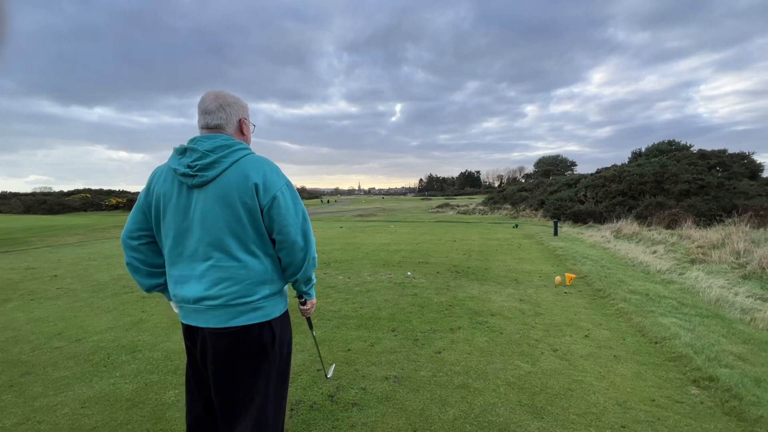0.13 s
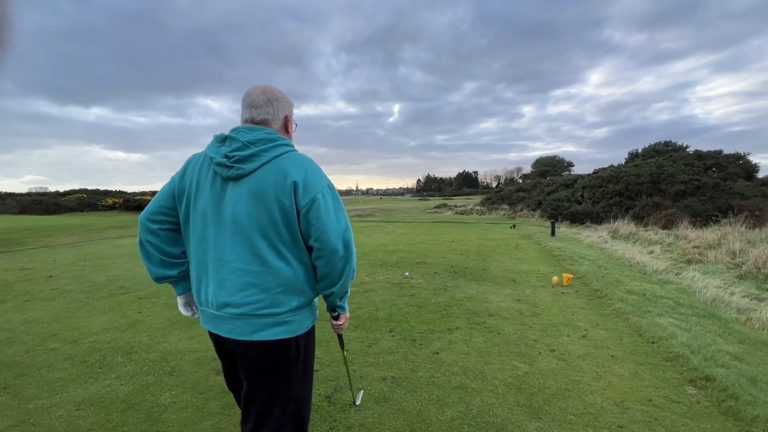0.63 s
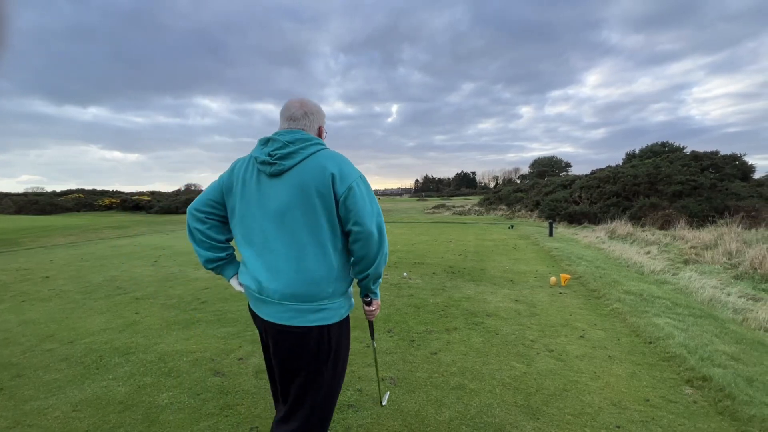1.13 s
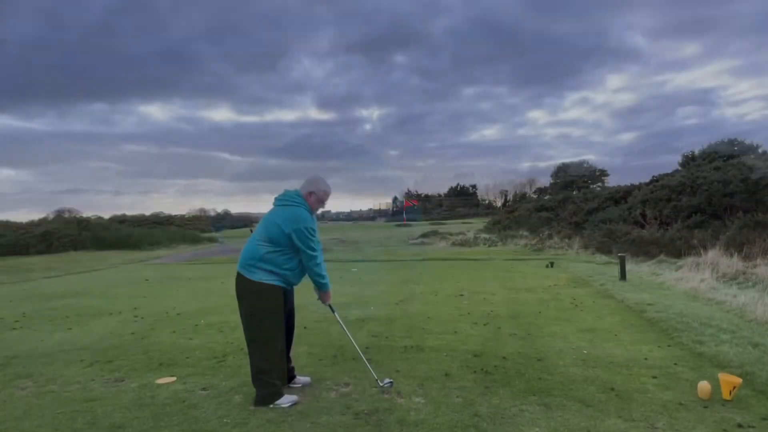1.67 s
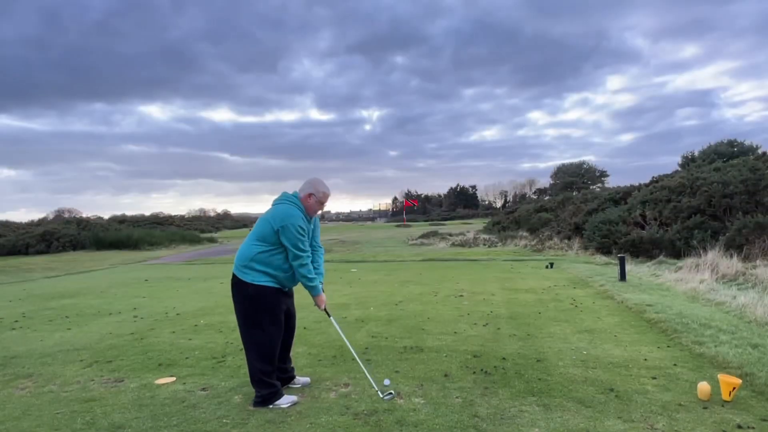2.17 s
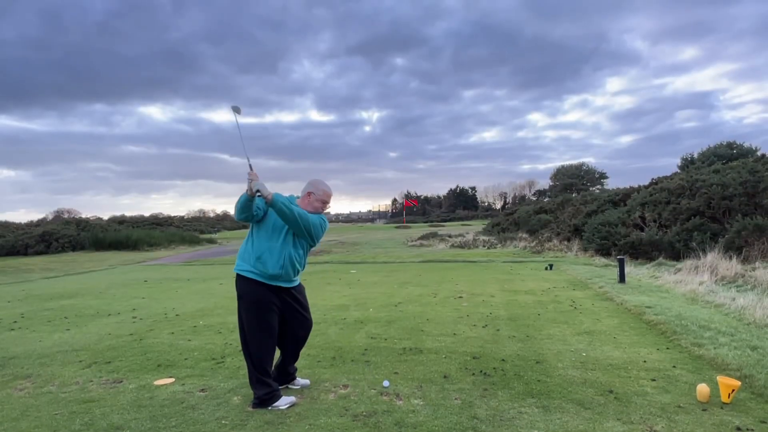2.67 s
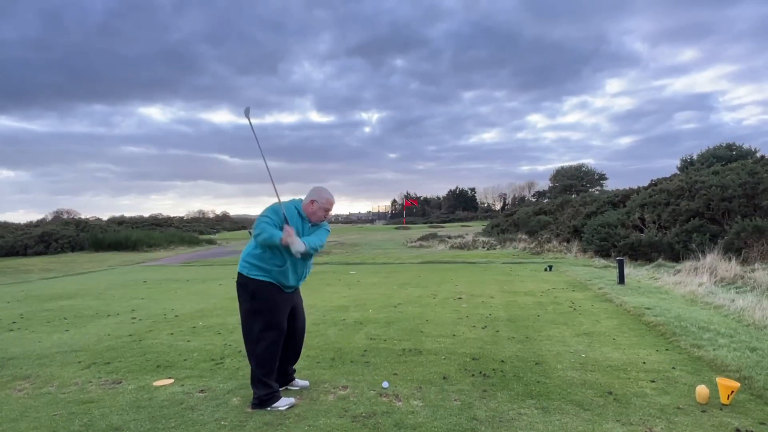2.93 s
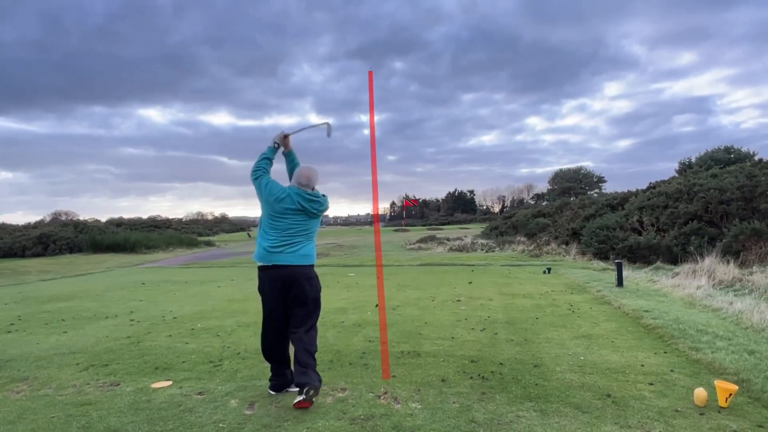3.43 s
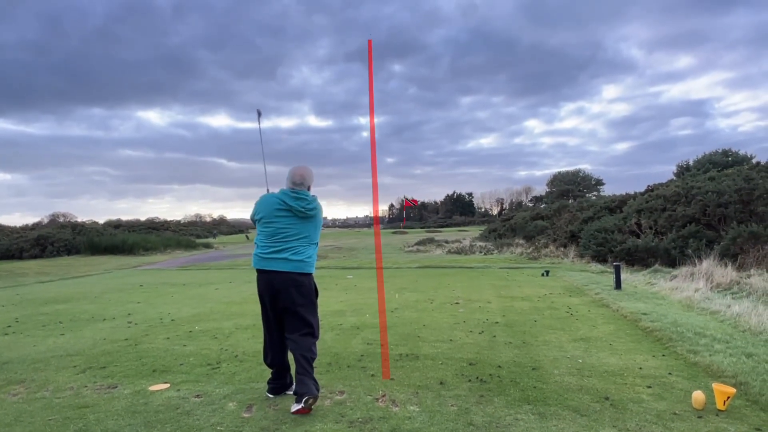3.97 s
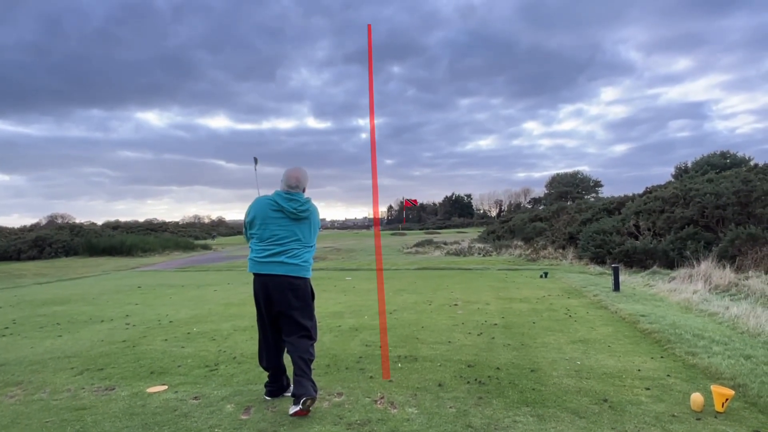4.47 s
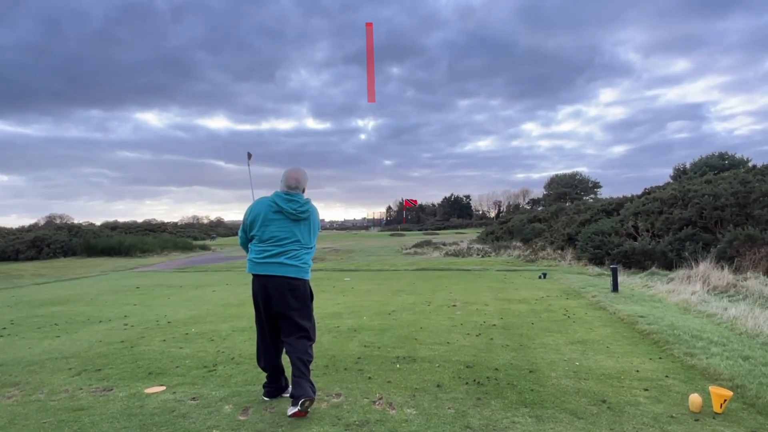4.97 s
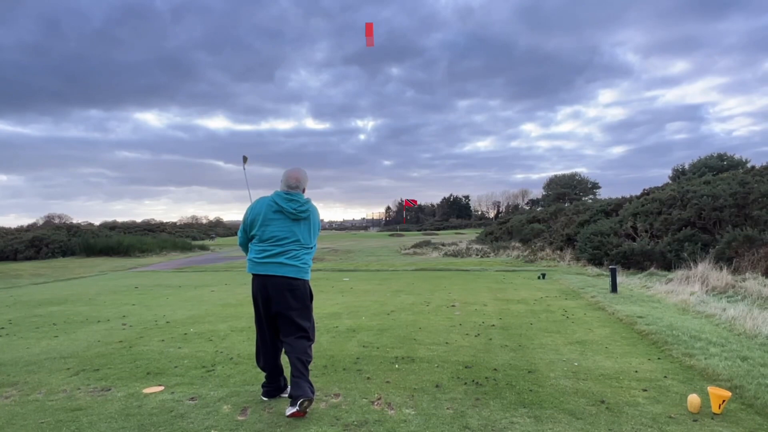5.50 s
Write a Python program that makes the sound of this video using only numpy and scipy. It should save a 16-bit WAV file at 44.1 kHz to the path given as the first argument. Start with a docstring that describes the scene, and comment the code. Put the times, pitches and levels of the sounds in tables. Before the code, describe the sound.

Quiet open-course rumble, cloth rustle and a quick falling bird trill, then one very loud, dry golf strike with a short scatter of grass.

```python
"""Open golf course: an iron swishes down, cracks on the ball, thumps the turf, and torn grass rains back.
Far traffic and wind are shaped noise; two distant engines near 60 Hz are sines that beat.
Birds are gliding sines with a diffuse tail; near cloth is noise that brightens with effort and breaks off
abruptly at 1.855 s. The strike is decaying club-head modes, noise cracks and sinking low thuds."""
import sys
import numpy as np
from scipy import signal
from scipy.fft import rfft, irfft
from scipy.io import wavfile
from scipy.ndimage import uniform_filter1d, map_coordinates

SR = 44100
rng = np.random.default_rng(int(sys.argv[2]) if len(sys.argv) > 2 else 0)


def file_out(sig):
    """Save sig as 16-bit WAV at sys.argv[1]."""
    # one column per channel
    cols = np.atleast_2d(sig).T
    # limit, then scale
    lim = np.clip(cols, -1, 1)
    pcm = np.round(lim * 32767).astype(np.int16)
    wavfile.write(sys.argv[1], SR, pcm)


def volts_from_decibels(level):
    """Turn decibel levels (scalar or array-like) into linear amplitude factors."""
    exponent = np.asarray(level, float) / 20
    return 10 ** exponent


N = 247842  # samples

# Left-right likeness of far sound at spaced microphones. Each row: frequency in Hz, likeness (1 = identical).
FAR_LIKENESS = [(40, 1), (130, .88), (290, 0.98), (640, 0.46), (1100, .7), (1700, .6), (2600, .3),
                (5000, .1), (15000, 0.13)]
# Cloth strokes: two build up and stop short, the last builds up until the rustle breaks off at 1.855 s.
# Each row: peak in seconds, build-up in seconds, level in dB over rest.
CLOTH_STROKES = [(.37, 0.56, 4.5), (1.26, .35, 3.5), (1.855, .6, 3)]


def unit(x):
    """Scale to rms 1."""
    return x / np.sqrt(np.mean(x ** 2) + 1e-20)


def along(points, hz):
    """Interpolate (Hz, value) points on a log-frequency axis."""
    f, v = np.transpose(points)
    return np.interp(np.log(hz + 1), np.log(f + 1), v)


def curves(rows):
    """One value per sample for each column after the time in seconds."""
    s, *cols = np.transpose(rows)
    return [np.interp(np.arange(N) / SR, s, c) for c in cols]


def wobble(rate_hz):
    """Smooth random curve through normal-distributed knots, rate_hz knots a second."""
    knots = rng.standard_normal(int(N * rate_hz / SR) + 4)
    return map_coordinates(knots, [np.arange(N) * rate_hz / SR])


def pan(left_over_right_db):
    """Left and right gains for a level difference."""
    return volts_from_decibels(np.array([[left_over_right_db / 2], [-left_over_right_db / 2]]))


def add(track, s, sound):
    """Mix a stereo sound into the track at s seconds."""
    part = track[:, max(round(s * SR), 0):][:, :sound.shape[1]]
    part += sound[:, :part.shape[1]]


def from_left(pair):
    """Sound reaching the left microphone first: the right channel lags by 22 samples."""
    return np.array([pair[0], np.roll(pair[1], 22)])


def burst(noise, hz, width_hz):
    """Noise through one resonance, rms 1."""
    b, a = signal.iirpeak(hz, max(hz / width_hz, .3), SR)
    return unit(signal.lfilter(b, a, noise))


def mid_side_turn(alike, hz):
    """Angle that splits noise power between mid and side for a given left-right likeness."""
    return np.arccos(np.clip(along(alike, hz), -1, 1)) / 2


def shaped_noise(spectrum, alike, patchy_db, tilt=0, band_hz=(0, SR)):
    """Stereo noise with patches of random gain, rms 1 in band_hz before a tilt (dB per octave) about 3 kHz."""
    hz, t, z = signal.stft(rng.standard_normal((2, N)), SR, nperseg=1024, noverlap=768)
    white = np.mean(np.abs(z) ** 2)
    field = uniform_filter1d(rng.standard_normal(z.shape[1:]), size=10, axis=0)
    field = uniform_filter1d(field, size=12, axis=1)
    gain = volts_from_decibels(along(spectrum, hz)[:, None] + patchy_db * unit(field))
    turn = mid_side_turn(alike, hz)[:, None]
    mid, side = z * gain * [np.cos(turn), np.sin(turn)]
    pair = np.array([mid + side, mid - side])
    inside = ((hz >= band_hz[0]) & (hz < band_hz[1]))[:, None]
    band_rms = np.sqrt(np.mean(np.abs(pair * inside) ** 2) / white)
    slope = np.interp(t, np.arange(N) / SR, tilt * np.ones(N))  # tilt may change in time
    tilted = pair * volts_from_decibels(np.log2((hz[:, None] + 50) / 3000) * slope)
    return signal.istft(tilted, SR, nperseg=1024, noverlap=768)[1][:, :N] / band_rms


def low_roar():
    """Deep roar, rms 1 in 80-300 Hz, shaped on a finer frequency grid than the short-time noise."""
    # Roar spectrum. Each row: frequency in Hz, relative density in dB per Hz.
    roar_spectrum = [(13, -39), (22, -14), (43, -7), (70, -2), (108, -4.5), (177, -11.5), (221, -12.5),
                     (400, -23), (520, -51), (880, -120)]
    hz = np.fft.rfftfreq(N, 1 / SR)
    turn = mid_side_turn(FAR_LIKENESS, hz)
    gain = volts_from_decibels(along(roar_spectrum, hz))
    gain = gain / np.sqrt(np.mean(gain ** 2 * (hz > 80) * (hz < 300)))
    spectrum = rfft(rng.standard_normal((2, N)))
    mid, side = irfft(spectrum * gain * [np.cos(turn), np.sin(turn)], N)
    return np.array([mid + side, mid - side])


def air():
    """Far traffic and wind: a deep roar and a broad rush on one level curve, each with its own wobble."""
    # Level curve of roar and rush, fuller around 1.5 to 1.8 s. Each row: time in seconds, level in dB.
    air_level = [(0, -57.5), (.48, -59.5), (1.1, -60), (1.5, -56.5), (1.8, -56.5), (1.9, -60), (2.9, -58.5),
                 (4.9, -59), (5.62, -59.5)]
    # Rush spectrum. Each row: frequency in Hz, relative density in dB per Hz.
    rush_spectrum = [(180, -31), (300, -3.5), (490, -4), (775, -8), (955, -5.5), (1570, -15.5), (1970, -20),
                     (2400, -28.5), (3000, -33.5), (4500, -38), (5200, -38), (6100, -35.5), (7500, -42.5),
                     (10000, -49), (11800, -48.5), (13500, -61)]
    roar_over_rush_db = 6.5  # roar in 80-300 Hz against rush in 0.4-2 kHz
    early_rush_db = 1.5  # extra rush until 1.855 s
    level_db, = curves(air_level)
    roar_db = level_db + roar_over_rush_db + 0.6 * wobble(5.6)
    roar = volts_from_decibels(roar_db) * low_roar() * pan(-2)
    early = np.arange(N) / SR < CLOTH_STROKES[-1][0]
    rush_db = level_db + early_rush_db * early + .4 * wobble(6.4)
    rush = shaped_noise(rush_spectrum, FAR_LIKENESS, patchy_db=1.72, band_hz=(400, 2000))
    return from_left(roar + volts_from_decibels(rush_db) * rush)


def engine():
    """Two distant engines: unsteady firing tones, nearly in tune, throb as they drift in and out of step."""
    # Engine tones. Each row: time in seconds, upper tone in dB, lower tone in dB, beats per second.
    engine_tones = [(0, -58, -52.5, 1.75), (1.3, -58, -52.5, 1.75), (1.45, -43.5, -49, 2.07),
                    (1.9, -49, -52.5, 2.07), (5.62, -48.5, -52.5, 2.07)]
    upper_hz, in_step_s = 60.1, 3.05
    upper_db, lower_db, beat_hz = curves(engine_tones)
    phase = 2 * np.pi * upper_hz * np.arange(N) / SR + .5 * wobble(12)
    slip = 2 * np.pi * np.cumsum(beat_hz) / SR
    slip = slip - slip[round(in_step_s * SR)]
    tones = volts_from_decibels(upper_db) * np.sin(phase) + volts_from_decibels(lower_db) * np.sin(phase - slip)
    return np.sqrt(2) * volts_from_decibels(1.8 * wobble(12)) * tones * pan(-0.51)


def bird_notes():
    """All notes as (start s, length s, pitch track of (share of length, Hz), level dB)."""
    # Straight slides. Each row: start in seconds, length in seconds, start in Hz, end in Hz, level in dB.
    slides = [(0, .012, 3600, 3660, -72), (0.057, 0.019, 3650, 4300, -65), (.119, 0.019, 3550, 4540, -64.5),
              (0.146, .01, 3500, 3200, -70), (0.234, 0.018, 3450, 4600, -67.5),
              (0.486, 0.049, 3660, 3580, -75.5), (1.366, .0075, 6400, 6540, -69),
              (1.368, 0.024, 7140, 9900, -60.5), (1.391, 0.015, 9800, 9550, -64),
              (1.409, 0.022, 9000, 8800, -58.5), (1.427, 0.024, 9300, 9750, -66),
              (1.453, 0.0293, 9500, 8800, -67), (1.482, .014, 9200, 9700, -70),
              (1.434, 0.031, 7460, 6830, -54), (1.487, 0.011, 6440, 6540, -48),
              (1.553, .015, 7070, 5930, -51.5), (1.737, 0.031, 3370, 3460, -67),
              (1.786, 0.019, 3070, 3330, -65.5), (2.924, .021, 7050, 6850, -70),
              (2.944, .026, 6920, 6830, -69), (2.97, 0.027, 6880, 6700, -78.5),
              (4.021, .05, 7900, 8500, -86)]
    # Trill's low, dropping notes. Each row: start in seconds, start in Hz, level in dB, octave overtone in dB.
    drops = [(1.524, 4710, -51.5, -72), (1.563, 3930, -66, -68), (1.604, 3480, -71, -69),
             (1.643, 3140, -60.5, -68), (1.684, 2670, -67, -74)]
    # Trill's high notes, hooking up to pitch. Each row: start in seconds, pitch in Hz, level in dB.
    hooks = [(1.585, 5600, -59.5), (1.625, 4810, -57.5), (1.664, 3900, -64.5), (1.706, 3500, -73)]
    # Farther bird's whistles. Each row: start in seconds, length in seconds, top in Hz, level in dB.
    whistles = [(1.791, .165, 3550, -78), (2.518, .122, 3314, -74), (4.691, .208, 3433, -70)]
    # Whistle shape. Each row: share of length, pitch as a share of the top.
    arch = [(0, .87), (.06, .94), (.22, 0.98), (.55, 0.97), (.8, .94), (.88, .87), (1, .82)]
    drop_s, hook_s, hook_rise_s = .015, .026, .0075
    notes = []
    for s, length_s, start_hz, end_hz, db in slides:
        notes.append((s, length_s, [(0, start_hz), (1, end_hz)], db))
    for s, hz, db, overtone_db in drops:
        notes.append((s, drop_s, [(0, hz), (1, hz * .93)], db))
        notes.append((s, drop_s, [(0, 2 * hz), (1, 2 * hz * .93)], overtone_db))
    for s, hz, db in hooks:
        notes.append((s, hook_s, [(0, hz * .82), (hook_rise_s / hook_s, hz), (1, hz * .98)], db))
    for s, length_s, top_hz, db in whistles:
        notes.append((s, length_s, np.multiply(arch, [1, top_hz]), db))
    return notes


def birds():
    """Gliding sines: slides, a falling two-voiced trill, arched whistles; bushes return a soft noise-tail blur."""
    dry_song = np.zeros((2, N))
    for s, length_s, track, db in bird_notes():
        u = np.linspace(0, 1, round(length_s * SR))
        hz = uniform_filter1d(np.interp(u, *np.transpose(track)), size=100, mode="nearest")
        fade = np.clip(np.minimum(u, 1 - u) * length_s / .004, 0, 1)
        tone = np.sin(2 * np.pi * np.cumsum(hz) / SR)
        add(dry_song, s, np.sqrt(2) * volts_from_decibels(db) * fade * tone * pan(2.8))
    t = np.arange(SR // 4) / SR
    tail = rng.standard_normal((2, len(t))) * volts_from_decibels(-60 * t / .28) * (t > .004)
    tail = tail / np.linalg.norm(tail[0])
    blur = signal.fftconvolve(dry_song, tail, axes=1)[:, :N]
    return dry_song * volts_from_decibels(1.7 * wobble(120)) + volts_from_decibels(-7.0) * blur


def rustle():
    """Near cloth and grass: noise brighter with effort, breaking off abruptly at 1.855 s; narrow hiss swells."""
    # Cloth spectrum. Each row: frequency in Hz, relative density in dB per Hz.
    cloth_spectrum = [(400, -31), (800, 1.5), (1100, 2.5), (1800, -17.5), (3300, -16), (6000, -31),
                      (8300, -31.5), (11500, -36), (13000, -48), (14500, -82)]
    # Soft swells of hiss. Each row: middle in seconds, length in seconds, centre in Hz, width in Hz, level in dB.
    swells = [(0.763, 0.1, 1500, 700, -59.5), (1.807, 0.041, 1540, 396, -61.5),
              (2.41, 0.13, 1770, 300, -64)]
    rest_db, stop_s = -78.5, .037  # rest level in 2.3-3 kHz before tilt
    rest_tilt, tilt_per_db = -2.07, 1.26  # dB per octave; dB per octave per dB of effort
    t = np.arange(N) / SR
    effort_db = sum(np.interp(t, [s - rise_s, s, s + stop_s], [0, db, 0]) for s, rise_s, db in CLOTH_STROKES)
    cloth = shaped_noise(cloth_spectrum, FAR_LIKENESS, patchy_db=2.5,
                         tilt=rest_tilt + tilt_per_db * effort_db, band_hz=(2300, 3000))
    cloth_gain = (t < CLOTH_STROKES[-1][0]) * volts_from_decibels(rest_db + effort_db + 0.69 * wobble(32.07))
    out = cloth_gain * from_left(cloth)
    for s, length_s, hz, width_hz, db in swells:
        hiss = burst(burst(rng.standard_normal((2, N)), hz, width_hz), hz, width_hz)
        out += volts_from_decibels(db) * np.exp(-.5 * ((t - s) / (length_s / 2)) ** 2) * hiss
    return out


def ticks():
    """Small snaps of grass, soil and gear: dying noise bursts about a centre pitch."""
    # Ticks. Each row: start in seconds, initial level in dB, centre in Hz, width in Hz.
    snaps = [(.155, -60, 7800, 5000), (.78, -61.5, 3440, 4000), (.88, -62, 6500, 2000),
             (1.07, -68, 6550, 2500), (2.629, -60, 4970, 6074), (2.709, -56.5, 2680, 2600),
             (2.81, -68.5, 6440, 2970), (3.25, -65.5, 6950, 4920), (3.305, -62, 3100, 5007),
             (3.362, -62, 9500, 4000), (3.385, -65, 7940, 4920), (3.428, -63, 6000, 4000),
             (3.445, -61, 8000, 3930), (3.524, -60, 5200, 3500), (3.59, -73, 6380, 3024),
             (4.003, -55.5, 2683, 900), (4.003, -65, 7200, 2012), (5.38, -68, 5300, 1500)]
    out, t = np.zeros((2, N)), np.arange(SR // 20) / SR
    for s, db, hz, width_hz in snaps:
        shared, *own = rng.standard_normal((3, len(t)))
        noise = shared + 0.85 * np.array(own)
        snap = burst(burst(noise, hz, width_hz), hz, width_hz)
        add(out, s, volts_from_decibels(db - 60 * t / 0.013) * snap)
    return out


def swish():
    """Turbulence off the head grows up to the blow; torn grass crackles and settles after it."""
    # Gushes of air and grass (downswing, blow, torn divot, falling spray). Each row: peak in seconds,
    # rise in seconds, fall in seconds, level in dB, tilt in dB per octave.
    gushes = [(3.032, 0.027, .02, -48, -5), (3.066, 0.019, .007, -45, -2), (3.118, .012, 0.013, -57.5, 0.5),
              (3.15, .045, 0.21, -61, -2)]
    # Spray spectrum. Each row: frequency in Hz, relative density in dB per Hz.
    spray_spectrum = [(250, -30.5), (500, -4.5), (1000, -5.5), (2500, -5.5), (4500, -9), (6200, -10.5),
                      (9000, -18.5), (12500, -25.5), (16000, -38.5)]
    t = np.arange(N) / SR
    power = np.array([volts_from_decibels(db) ** 2 * np.exp(-((t - s) / np.where(t < s, rise_s, fall_s)) ** 2)
                      for s, rise_s, fall_s, db, _ in gushes])
    total = power.sum(0)
    tilt = np.transpose(gushes)[-1] @ power / (total + 1e-30)  # power-weighted mean
    crackle_db = np.where(t < gushes[2][0], 1.3, 4)  # air, then grass
    grains = volts_from_decibels(crackle_db * np.array([wobble(220), wobble(250)]))
    spray = shaped_noise(spray_spectrum, [(500, 0.34), (5000, .4)], patchy_db=2.0, tilt=tilt)
    return np.sqrt(total) * grains * spray * pan(-2.496)


def impact():
    """Each contact rings the head's modes nearest its own pitch and spits a short noise crack."""
    # Contacts of face, ball and tee. Each row: start of ring in seconds, level in dB, centre in Hz,
    # spread in octaves, left over right in dB.
    contacts = [(3.0671, -18.5, 2800, 1.1, -4.5), (3.0685, -9.5, 1304, 1.1, -10),
                (3.0706, -1.5, 6500, .7, -2), (3.0718, -5.5, 4000, .52, -8), (3.0733, -20.5, 4500, .4, 3)]
    # Modes of club head and ball. Each row: frequency in Hz, level in dB, t60 in seconds.
    head_modes = [(475.6, -9.5, 0.022), (890, -4, 0.0099), (1157, -3.5, .008), (1810, -3, 0.012),
                  (2250, -2, 0.0092), (2920, -7, 0.0093), (3780, -1.5, 0.0083), (4500, -6.5, 0.0097),
                  (6133, 3, .008), (7200, -13, .006), (8500, -11.5, 0.0046), (10500, -12.5, 0.0024),
                  (11840, 0.5, .005), (15000, -9.5, .004)]
    lead_s = .0003  # crack ahead of ring
    out, t = np.zeros((2, N)), np.arange(SR // 4) / SR
    hz, level_db, t60_s = np.transpose(head_modes)[:, :, None, None]  # axes: mode, channel, time
    for s, db, centre_hz, spread_octaves, side_db in contacts:
        left_lag_s = (.045 + .003 * side_db) / 1000
        late = np.clip(t - np.array([[lead_s + left_lag_s], [lead_s]]), 0, None)
        share = np.exp(-.5 * (np.log2(hz / centre_hz) / spread_octaves) ** 2)
        onset = 1 - np.exp(-late / 0.00045)
        ring = share * volts_from_decibels(level_db - 60 * late / t60_s) * np.sin(2 * np.pi * hz * late) * onset
        crack = 0.11 * volts_from_decibels(-60 * t / 0.011) * rng.standard_normal((2, len(t)))
        add(out, s - lead_s, volts_from_decibels(db) * pan(side_db) * (ring.sum(0) + crack))
    return out


def turf():
    """Sole in the turf: low sines sink in pitch while dull resonant noise marks the soil giving way."""
    # Thuds. Each row: start in seconds, first Hz, last Hz, level in dB, t60 in seconds.
    thuds = [(3.069, 415.6, 211, -32.5, 0.16), (3.074, 191, 122, -28, .16), (3.0791, 75, 60, -35, .2)]
    soil_s, soil_db, soil_hz, soil_t60_s = 3.076, -34.5, 140, .2
    out, t = np.zeros((2, N)), np.arange(SR // 4) / SR
    for s, first_hz, last_hz, db, t60_s in thuds:
        hz = last_hz + (first_hz - last_hz) * np.exp(-t / 0.0081)
        thud = np.sin(2 * np.pi * np.cumsum(hz) / SR) * (1 - np.exp(-t / .006))
        add(out, s, pan(-1.5) * volts_from_decibels(db - 60 * t / t60_s) * thud)
    soil = burst(burst(rng.standard_normal(len(t)), soil_hz, soil_hz), soil_hz, 2 * soil_hz)
    soil = soil * (1 - np.exp(-t / .008))
    add(out, soil_s, pan(-1.5) * volts_from_decibels(soil_db - 60 * t / soil_t60_s) * soil)
    return out


def scene():
    """Everything the microphones hear."""
    return air() + engine() + birds() + rustle() + ticks() + swish() + impact() + turf()


def low_pass(x):
    """Removes everything above the highest recorded frequency."""
    return signal.sosfilt(signal.butter(12, 16620, fs=SR, output="sos"), x)


def record(dry):
    """The finished stereo mix as the recorder stores it."""
    return low_pass(dry)


dry = scene()
out = record(dry)
file_out(out)
```